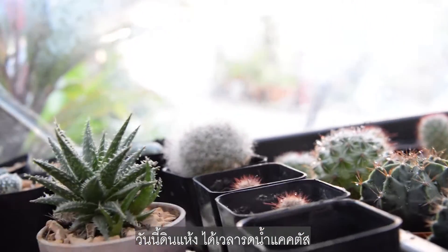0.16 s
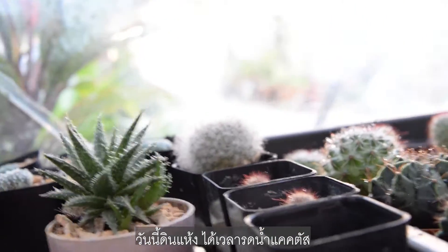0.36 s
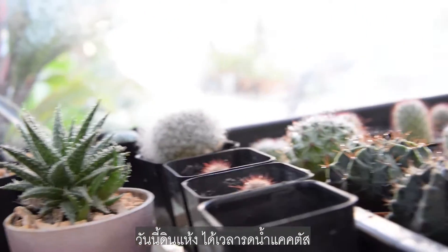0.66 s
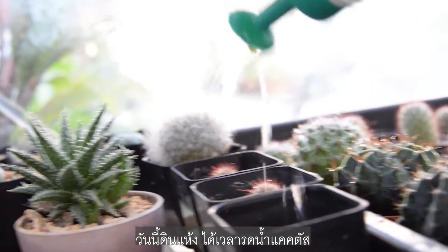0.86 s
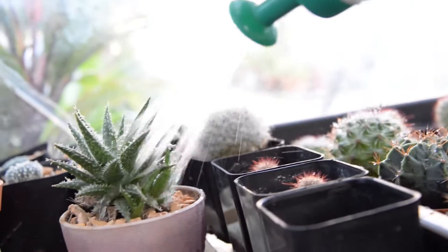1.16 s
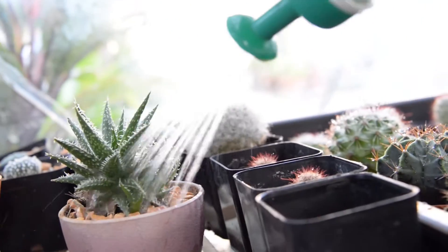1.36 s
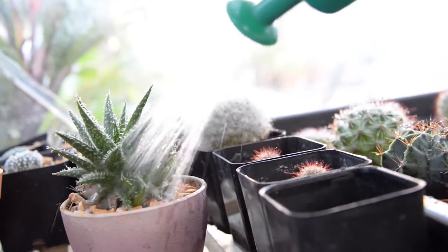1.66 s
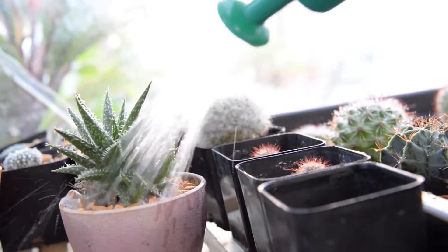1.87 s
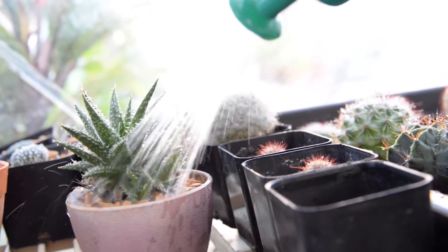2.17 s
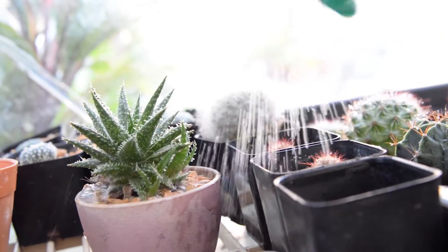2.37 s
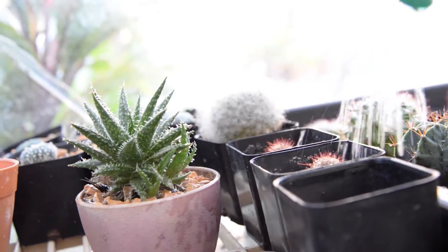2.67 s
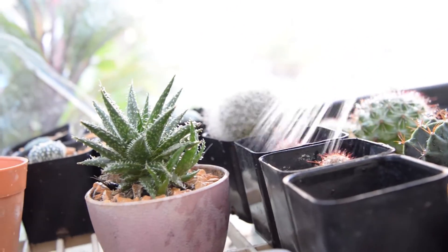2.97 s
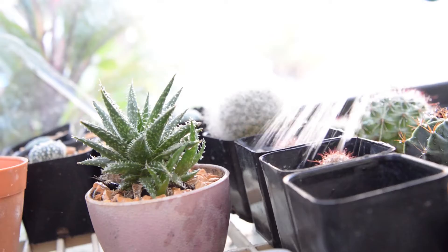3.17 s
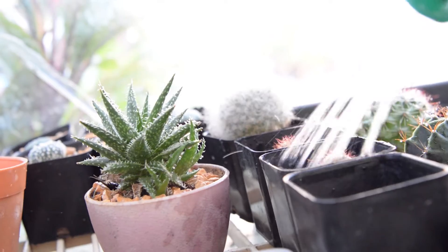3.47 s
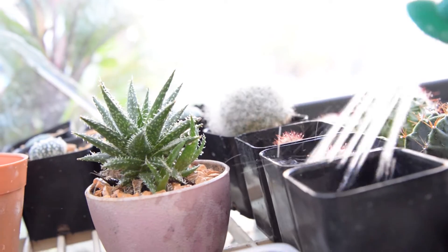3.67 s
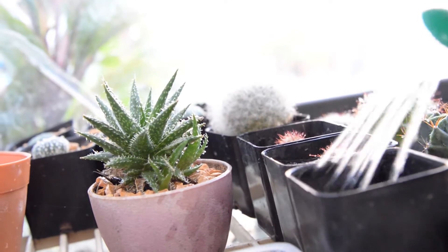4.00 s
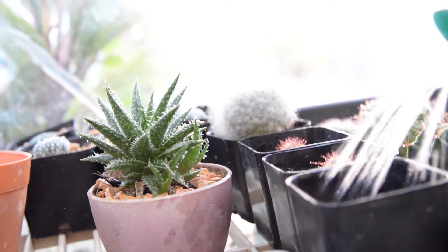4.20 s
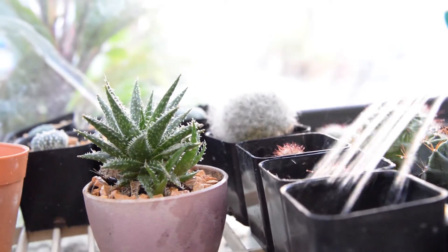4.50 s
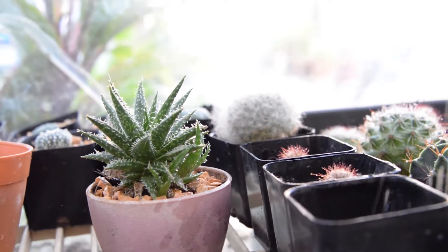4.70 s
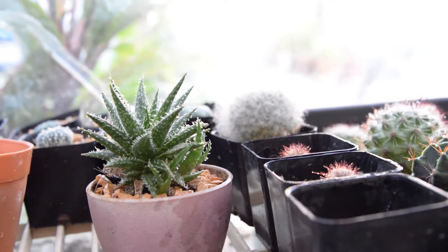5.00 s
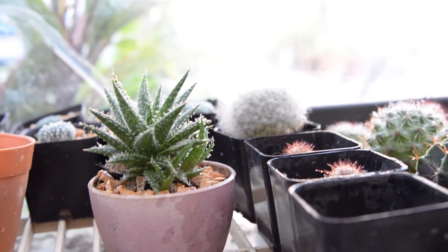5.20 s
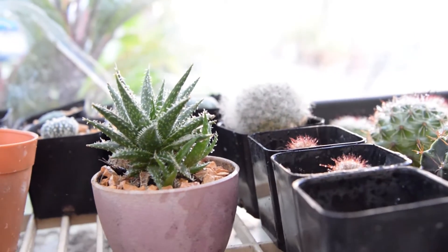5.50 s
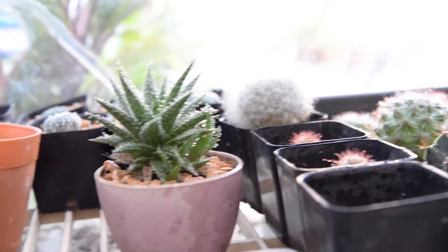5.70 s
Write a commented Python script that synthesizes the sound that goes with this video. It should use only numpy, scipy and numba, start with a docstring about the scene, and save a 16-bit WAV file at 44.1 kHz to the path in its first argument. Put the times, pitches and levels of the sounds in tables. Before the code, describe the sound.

Close watering of potted plants: crisp droplets tick and spatter, hollow plastic knocks and short scrapes interrupt, with quiet rumble underneath.

```python
"""Spray patters over a low hum and faint air; a plastic pot scrapes and knocks; single drops tick throughout.
A hand waters potted cacti on a wire shelf under a greenhouse roof, close to a small camera.
Knocks are decaying modes with noise; scrapes and spray are random impacts through resonant spectra;
drops are short noise bursts; air is shaped noise. The camera's gain control ducks after hard knocks
and its limit clips the hardest. Source levels are those before the gain control."""
import sys
import numpy as np
from scipy import signal
from scipy.fft import rfft, irfft, next_fast_len
from scipy.io import wavfile
from scipy.ndimage import uniform_filter1d
from numba import njit

SR = 44100
rng = np.random.default_rng(int(sys.argv[2]) if len(sys.argv) > 2 else 0)


def persist_wave(psi):
    """Save psi, clipped to +-1, as 16-bit WAV."""
    counts = np.round(np.clip(psi, -1, 1) * 32767).astype(np.int16)
    wavfile.write(sys.argv[1], SR, np.atleast_2d(counts).T)


N = 257984
T = np.arange(N) / SR  # [s]
SHORT = T[:SR // 4]  # time axis of one knock or drop [s]


def undb(db):
    """Decibel law: level to amplitude ratio."""
    return 10 ** (np.asarray(db) / 20)


def unit(x):
    """Normalisation to rms 1."""
    return x / np.sqrt(np.mean(x ** 2))


def colour(x, table):
    """Linear filtering: shape the spectrum by (Hz, dB) points; rms near 1 for white input of rms 1."""
    hz, db = np.transpose(table)
    size = next_fast_len(len(x))
    bin_hz = np.arange(size // 2 + 1) * SR / size
    gain = undb(np.interp(np.log(bin_hz + 1), np.log(hz), db))
    return irfft(rfft(x, size) * unit(gain), size)[:len(x)]


def band(x, hz, ratio):
    """Band-pass filtering between hz / ratio and hz * ratio; rms 1."""
    sos = signal.butter(2, [hz / ratio, hz * ratio], "bandpass", fs=SR, output="sos")
    return unit(signal.sosfilt(sos, x))


def fade(t, t60):
    """Exponential damping, 60 dB down after t60 seconds."""
    return np.exp(-np.log(1000) * t / t60)


def strike(x, db):
    """Impact level: scale a decaying sound to its rms over the first 30 ms."""
    blow = SR * 3 // 100
    return undb(db) * x / np.sqrt(np.mean(x[:blow] ** 2))


def add(out, s, x):
    """Superposition: mix a short sound in at s seconds."""
    i = max(int(s * SR), 0)
    out[i:i + len(x)] += x[:N - i]


def points(table):
    """Linear interpolation of (time, level) points over the scene."""
    return np.interp(T, *np.transpose(table))


def walk(rate):
    """Slow random modulation: levels held 1 / rate s and slewed twice; spread near 1."""
    k = int(SR / rate)
    held = rng.standard_normal(N)[np.arange(N) // k]
    return 1.3 * uniform_filter1d(uniform_filter1d(held, k), k)


def patter(rate, spread_db, t60):
    """Random impacts: noise under uneven sudden onsets (rate per second) that die away quickly; rms 1."""
    hits = (rng.random(N) < rate / SR) * undb(spread_db * rng.exponential(size=N))
    decay = np.exp(-np.log(1000) / (t60 * SR))
    swell = signal.lfilter([1], [1, -decay], hits)
    return unit(swell * rng.standard_normal(N))


# rumble level before its random wavering: (time [s], level [dB rms])
RUMBLE_LEVEL = [(0, -63), (1.0, -65), (1.7, -64), (2.2, -68), (2.9, -65), (3.6, -64), (4.2, -67),
                (5.05, -69), (5.3, -64), (5.85, -60)]
# rumble spectrum: (frequency [Hz], relative density [dB per Hz])
RUMBLE_SPECTRUM = [(12, -50), (30, -28), (55, -14), (80, -5), (99, 2), (118, -7), (150, -15), (200, -22),
                   (300, -50)]
# spectrum of the even hiss: (frequency [Hz], relative density [dB per Hz])
AIR_SPECTRUM = [(15, -12), (60, -10), (150, -12), (200, -11), (340, -10), (800, -17), (1700, -18),
                (2300, -30), (4500, -25), (8000, -38), (16000, -44)]


def air():
    """Spectral shaping of noise: a distant low rumble that swells and wavers, over a faint even hiss."""
    rumble_db = points(RUMBLE_LEVEL) + 2.5 * walk(9)
    rumble = undb(rumble_db) * colour(rng.standard_normal(N), RUMBLE_SPECTRUM)
    hiss = undb(-66) * colour(rng.standard_normal(N), AIR_SPECTRUM)
    return rumble + hiss


# fine spray on leaves and gravel: (time [s], level [dB rms])
LEAF_LEVEL = [(0.0, -60), (0.36, -60), (0.48, -69), (0.84, -68), (1.08, -57), (1.32, -55), (1.6, -56),
              (1.8, -51), (2.04, -52), (2.25, -57), (2.5, -54), (2.64, -65), (3.0, -52), (3.24, -55),
              (3.6, -52), (3.72, -59), (3.96, -51), (4.2, -59), (4.75, -58), (4.92, -68), (5.12, -67),
              (5.23, -60), (5.33, -64), (5.52, -52), (5.66, -55), (5.73, -61), (5.85, -59)]
# water drumming on pot walls: (time [s], level [dB rms])
WALL_LEVEL = [(0, -60), (.48, -66), (1.5, -66), (1.9, -61), (2.6, -63), (2.8, -54), (3.05, -54),
              (3.45, -58), (3.72, -64), (3.98, -57), (4.3, -63), (4.78, -62), (4.92, -68), (5.45, -60),
              (5.85, -60)]
# fine mist, strongest while the can is near: (time [s], level relative to leaf spray [dB])
MIST_LEVEL = [(0, -19), (1.05, -18), (1.25, -13), (2.3, -15), (2.55, -23), (3.0, -17), (3.75, -16),
              (4.1, -19), (4.7, -21), (5.05, -16), (5.5, -22)]
# spectra of splash and grit, pot wall, and mist: (frequency [Hz], relative density [dB per Hz])
SPLASH_SPECTRUM = [(1500, -40), (2300, -14), (2780, -2), (3050, -5), (3700, -1), (4600, 0), (5400, -4),
                   (5900, 1), (6500, -7), (7600, -17), (10000, -34), (16000, -48)]
WALL_SPECTRUM = [(120, -49), (200, -19), (316, -10), (377, -12), (432, -8), (726, -8), (885, -1),
                 (1210, -6), (1760, -2), (2030, -13), (2400, -15), (3120, -47), (5280, -120)]
MIST_SPECTRUM = [(5000, -30), (7500, -4), (8300, -1), (9400, -7), (10200, -1), (11200, -11), (12500, -12),
                 (14700, -14), (16000, -18)]


def spray():
    """Random impact excitation: fine drops, in groups with their own pitch, on leaves, gravel and pot walls."""
    pitches = 2700 * 2 ** np.linspace(0, 1.5, 7)  # [Hz]
    groups = sum(np.sqrt(hz) * band(patter(300, 2.8, .035), hz, 1.12) for hz in pitches)
    broad = patter(150, 3.5, .03)
    fine = unit(colour(unit(groups) + .3 * broad, SPLASH_SPECTRUM))
    mist = colour(patter(800, 2.4, .025), MIST_SPECTRUM)
    wall = colour(patter(800, 2.2, .04), WALL_SPECTRUM)
    leaves = undb(points(LEAF_LEVEL)) * (fine + undb(points(MIST_LEVEL)) * mist)
    return leaves + undb(points(WALL_LEVEL)) * wall


# plastic on the shelf, levels before uneven grip: (start [s], end [s], body [dB rms], hiss [dB rms])
SCRAPE_EVENTS = [(0., .035, -47, -45), (.15, .275, -51, -50), (.295, .345, -52, -45), (.505, .58, -50, -58),
                 (.925, .965, -55, -52), (1.025, 1.045, -49, -55), (1.035, 1.062, -58, -47),
                 (2.435, 2.47, -35, -33), (2.47, 2.495, -37, -37), (2.62, 2.67, -53, -60),
                 (2.695, 2.735, -52, -54), (2.77, 2.805, -41, -44), (4.74, 4.778, -33, -34),
                 (4.785, 4.865, -39, -42), (3.91, 3.965, -60, -48), (5.5, 5.575, -56, -49),
                 (5.755, 5.85, -55, -55)]
# a rim that sings as it slips, before random wavering:
# (start [s], end [s], first pitch [Hz], last pitch [Hz], level [dB])
RIM_SQUEAK = (2.758, 2.785, 1500, 1950, -32)


def scrapes():
    """Stick-slip friction: dense uneven slips shake the pot wall and hiss; one locks into a rising squeak."""
    body = colour(patter(1200, 1.8, .03), WALL_SPECTRUM)
    hiss = colour(patter(1400, 2.1, .025), SPLASH_SPECTRUM)
    body_grip_db, hiss_grip_db = 2.5 * walk(90), 2.5 * walk(90)
    out = np.zeros(N)
    for start, end, body_db, hiss_db in SCRAPE_EVENTS:
        onset = np.clip((T - start) / (.3 * (end - start)), 0, 1)
        release = np.exp(-np.maximum(T - end, 0) / .012)
        slips = undb(body_db + body_grip_db) * body + undb(hiss_db + hiss_grip_db) * hiss
        out += onset * release * slips

    start, end, from_hz, to_hz, db = RIM_SQUEAK
    pitch = np.interp(T, [start, end], [from_hz, to_hz]) * (1 + .045 * walk(600))
    phase = 2 * np.pi * np.cumsum(pitch) / SR
    press = np.sin(np.pi * np.clip((T - start) / (end - start), 0, 1)) ** .6
    press = press * undb(3 * walk(500) - 2.5)
    harmonics = np.sin(phase) + .22 * np.sin(2 * phase) + .16 * np.sin(3 * phase)
    return out + undb(db) * press * harmonics


# blows: (time [s], thud centre [Hz], body centre [Hz], snap centre [Hz],
#         thud level [dB], body level [dB], snap level [dB])
BLOWS = [(0.003, 440, 918, 3600, -44, -44, -41), (0.1174, 690, 904, 5960, -43, -47, -36),
         (0.333, 455, 802, 4270, -55, -48, -41), (0.7535, 425, 867, 4190, -46, -42, -46),
         (1.0793, 541, 1300, 2550, -47, -26, -33), (1.585, 342, 1050, 5620, -57, -64, -64),
         (1.7146, 342, 869, 4660, -41, -44, -40), (1.901, 480, 1800, 3760, -29, -34, -46),
         (2.1196, 676, 960, 3180, -37, -22, -32), (2.225, 668, 1070, 3760, -37, -21, -32),
         (2.4262, 500, 853, 5080, -33, -28, -42), (2.4965, 520, 1850, 3830, -32, -19, -25),
         (2.780, 330, 860, 3500, -43, -47, -56), (2.8064, 646, 902, 2540, -46, -24, -34),
         (3.43, 363, 869, 5990, -56, -65, -66), (3.5563, 400, 1300, 3900, -42, -40, -36),
         (3.5625, 400, 869, 4300, -28, -31, -45), (3.9682, 676, 1060, 4190, -42, -22, -38),
         (4.0946, 455, 1050, 3400, -46, -20, -26), (4.8052, 627, 1350, 4610, -37, -27, -24),
         (4.828, 657, 1600, 3710, -36, -24, -22), (4.859, 342, 1780, 3380, -41, -39, -57),
         (5.4139, 673, 856, 5280, -45, -36, -35), (5.562, 439, 845, 4660, -51, -53, -41),
         (5.758, 323, 1600, 5000, -52, -52, -54)]
# shelf mode (below 200 Hz) and pot modes, before chance and blow strength:
# (frequency [Hz], relative level [dB], decay time t60 [s])
MODES = [(102, 0, .16), (300, -8, .05), (339, 0, .09), (430, -3, .11), (490, -4, .03), (558, -8, .17),
         (650, -4, .05), (867, 0, .045), (1060, 0, .045), (1300, -3, .04), (1530, -1, .045),
         (1640, -3, .045), (1770, 0, .05), (1900, -5, .04)]
# shelf level under the thud; lighter, higher thuds shake it less
SHELF_DB, SHELF_DB_PER_OCT, HEAVY_HZ = -8, -15, 340
RING_LOSS_PER_DB, MEDIUM_DB = .012, -35  # harder blows ring shorter
CRACK_DB, CRACK_GROWTH, SHARP_DB = -16, .7, -30  # crack under the snap; it grows faster than the snap


def knocks():
    """Modal excitation: blows ring shelf and pot, most the modes near each centre; grit rattles in a snap."""
    out, t = np.zeros(N), SHORT
    hz, mode_db, t60 = np.transpose(MODES)[:, :, None]
    shelf, low = hz[:, 0] < 200, hz[:, 0] < 720
    rise = np.minimum(t / .001, 1)
    for s, thud_hz, body_hz, snap_hz, thud_db, body_db, snap_db in BLOWS:
        shelf_db = thud_db + SHELF_DB + SHELF_DB_PER_OCT * np.log2(thud_hz / HEAVY_HZ)
        crack_db = snap_db + CRACK_DB + CRACK_GROWTH * (snap_db - SHARP_DB)
        ring = 1 - RING_LOSS_PER_DB * (body_db - MEDIUM_DB)

        level_chance, pitch_chance = rng.standard_normal((len(MODES), 2)).T[:, :, None]
        centre_hz = np.where(low[:, None], thud_hz, body_hz)
        favour_db = -16 * np.log2(hz / centre_hz) ** 2
        tones = np.sin(2 * np.pi * hz * (1 + .025 * pitch_chance) * t)
        modes = undb(mode_db + favour_db + 3 * level_chance) * fade(t, t60 * ring) * tones
        heavy = modes[shelf][0] * np.minimum(t / .008, 1)  # the heavy shelf starts slowly
        thud = band(modes[low & ~shelf].sum(axis=0), 520, 1.65)
        body = modes[~low].sum(axis=0)

        rattle = fade(t, .042 * ring) + undb(-22) * fade(t, .13)
        grit = colour(rng.standard_normal(len(t)), SPLASH_SPECTRUM)
        clack = colour(rng.standard_normal(len(t)), WALL_SPECTRUM) * rattle
        snap = (.8 * grit + .6 * band(grit, snap_hz, 1.2) + .4 * band(grit, 2700, 1.25)) * rattle
        crack = band(rng.standard_normal(len(t)), 11500, 1.45) * fade(t, .025)

        knock = strike(heavy, shelf_db) + strike(thud, thud_db)
        knock += strike(body, body_db - 1.5) + strike(clack, body_db - 6)
        knock += strike(snap, snap_db) + strike(crack, crack_db)
        add(out, s - .0004, knock * rise)
    return out


# the loudest single drops: (time [s], level before onset and decay [dB], pitch [Hz])
SINGLE_DROPS = [(0.1545, -33, 5020), (0.2638, -37, 4660), (0.2992, -35, 4410), (0.398, -33, 5440),
                (0.4144, -41, 4380), (0.8989, -43, 4290), (0.9263, -43, 5790), (1.2644, -41, 5940),
                (1.511, -41, 4620), (1.5444, -40, 5900), (1.7624, -33, 4670), (2.388, -28, 4150),
                (2.6693, -44, 6890), (2.7008, -40, 4610), (2.7244, -40, 5640), (2.9881, -39, 4720),
                (3.0864, -36, 4230), (3.1093, -34, 2820), (3.1926, -40, 5450), (3.2555, -39, 3450),
                (3.3149, -35, 5310), (3.3433, -31, 3430), (3.3957, -38, 5740), (3.8417, -30, 4700),
                (3.894, -35, 4650), (4.2213, -39, 4210), (4.2512, -44, 5430), (4.362, -41, 5420),
                (4.3849, -43, 3470), (4.4253, -44, 4230), (4.4483, -34, 5450), (4.5141, -34, 4750),
                (4.59, -37, 5910), (4.6209, -28, 6360), (4.6414, -37, 4670), (4.6823, -36, 3990),
                (4.7416, -32, 5810), (4.7516, -27, 5760), (4.7714, -28, 5590), (5.3752, -41, 5320),
                (5.4464, -40, 5610), (5.4744, -40, 3900), (5.517, -38, 5000), (5.7089, -46, 3130),
                (5.835, -44, 5200)]


def drops():
    """Impulsive excitation: a drop is a broad tick and a short spatter around its own pitch."""
    out, t = np.zeros(N), SHORT
    envelope = fade(t, .03) * np.minimum(t / .0015, 1)
    for s, db, hz in SINGLE_DROPS:
        noise = rng.standard_normal(len(t))
        tick = .4 * colour(noise, SPLASH_SPECTRUM) + .04 * colour(noise, MIST_SPECTRUM)
        spatter = .75 * band(rng.standard_normal(len(t)), hz, 1.18)
        add(out, s - .0012, undb(db) * (spatter + tick) * envelope)
    return out


def scene():
    """Linear superposition of all sources in one channel."""
    return (air() + spray() + scrapes() + knocks() + drops())[None]


@njit
def follow(x, attack, release):
    """Envelope detection by one-pole smoothing that rises fast and falls slowly."""
    out, e = np.empty(len(x)), 0.
    for i in range(len(x)):
        e += (x[i] - e) * (attack if x[i] > e else release)
        out[i] = e
    return out


CLIP = .092  # amplitude limit
DUCK_DB, DUCK_RATIO, ATTACK_S, RELEASE_S = -46, 1.6, .012, .22  # gain control threshold, ratio, times


def record(dry):
    """Dynamic compression: gain lags a knock, so the hardest clip at first; the gain then creeps back."""
    loudness = np.minimum(np.abs(dry[0]), 2 * CLIP)
    heard = follow(loudness, 1 / (ATTACK_S * SR), 1 / (RELEASE_S * SR))
    gain = np.minimum(undb(DUCK_DB) / (heard + 1e-9), 1) ** (1 - 1 / DUCK_RATIO)
    flat = np.clip(dry * gain, -CLIP, CLIP)
    flat = signal.sosfilt(signal.butter(2, 35, "highpass", fs=SR, output="sos"), flat)
    # steep low-pass at 16 kHz
    return signal.sosfilt(signal.ellip(8, .2, 70, 16000, fs=SR, output="sos"), flat)


dry = scene()
out = record(dry)
persist_wave(out)
```